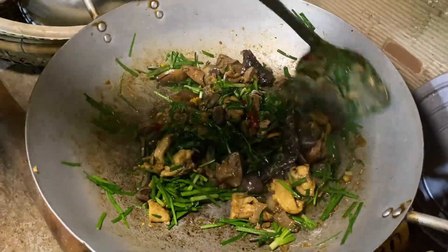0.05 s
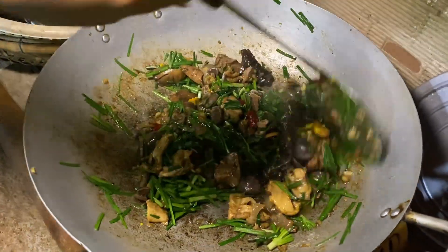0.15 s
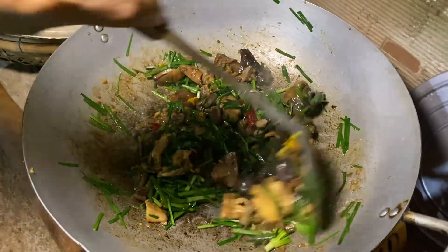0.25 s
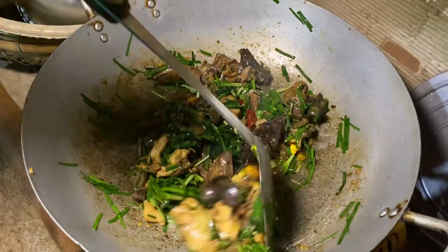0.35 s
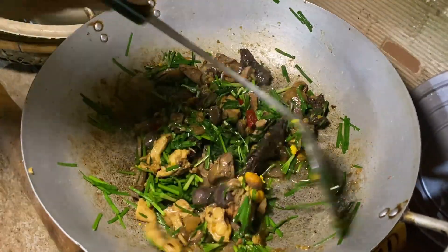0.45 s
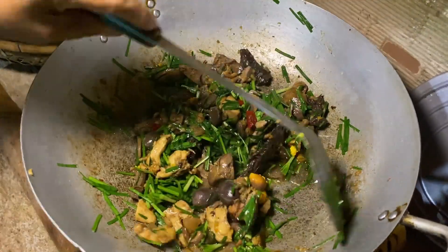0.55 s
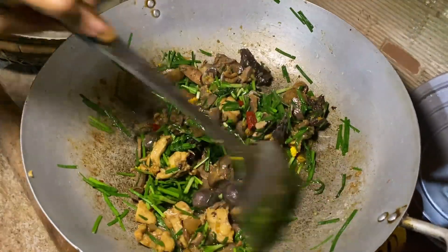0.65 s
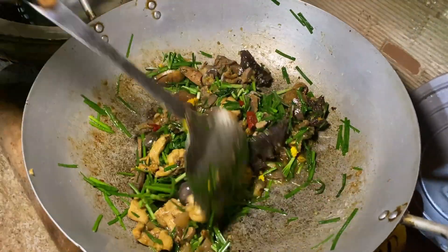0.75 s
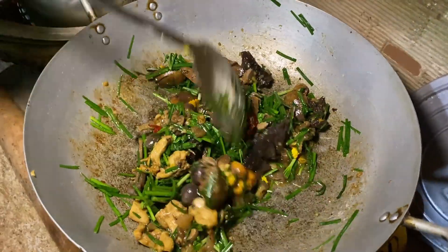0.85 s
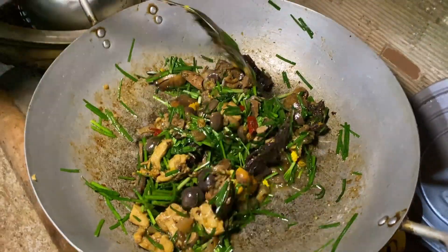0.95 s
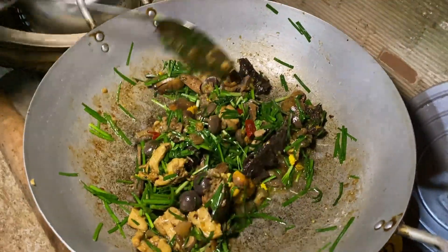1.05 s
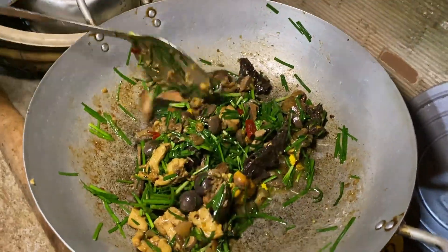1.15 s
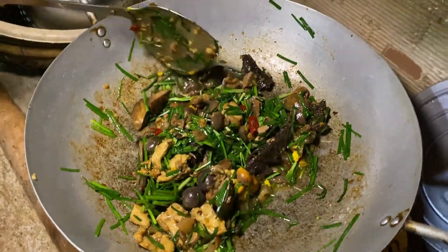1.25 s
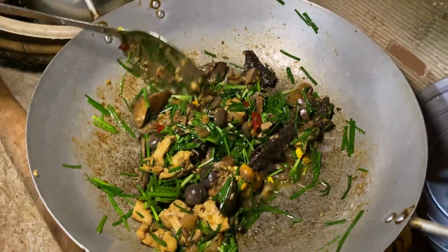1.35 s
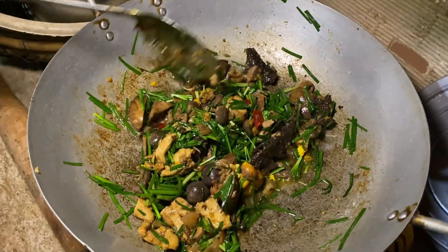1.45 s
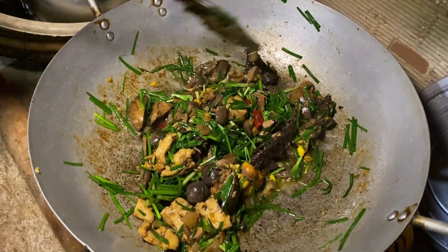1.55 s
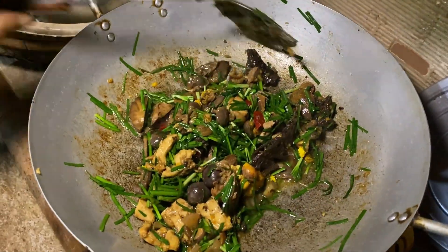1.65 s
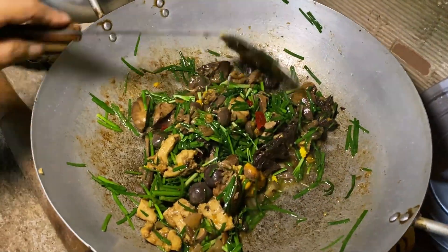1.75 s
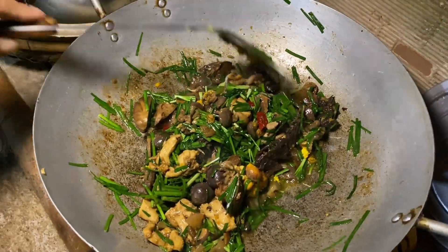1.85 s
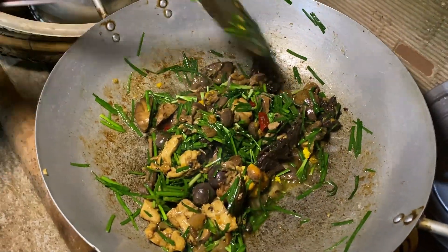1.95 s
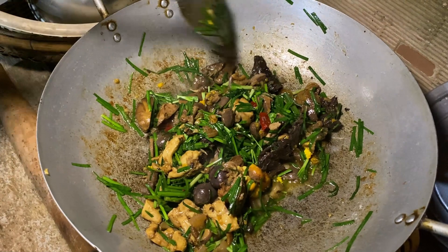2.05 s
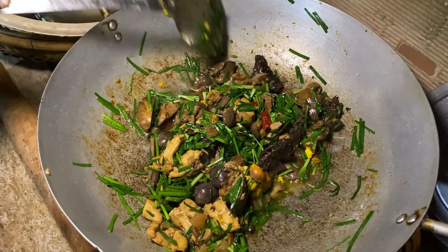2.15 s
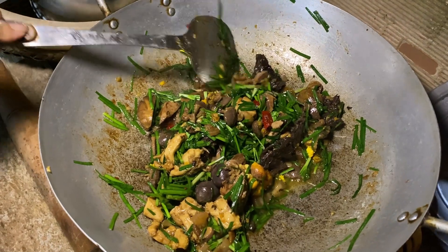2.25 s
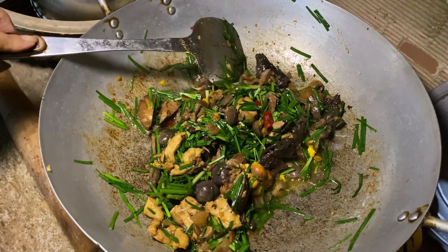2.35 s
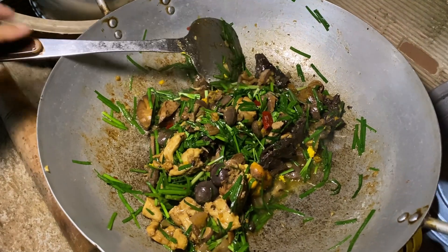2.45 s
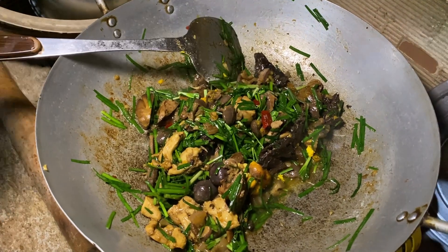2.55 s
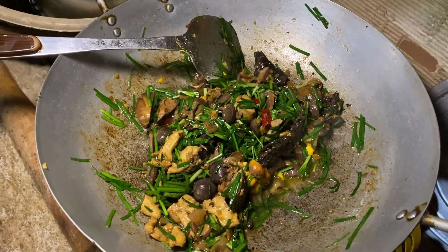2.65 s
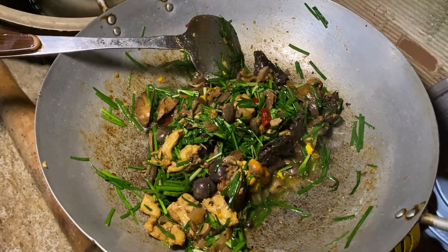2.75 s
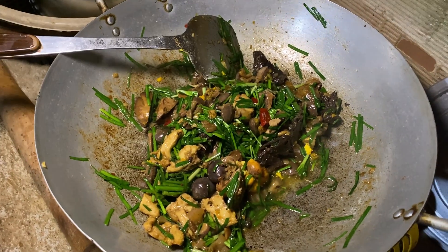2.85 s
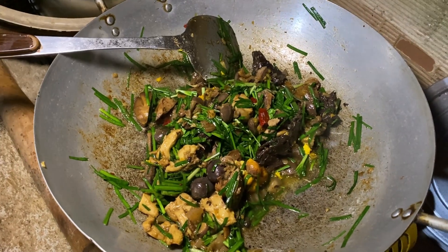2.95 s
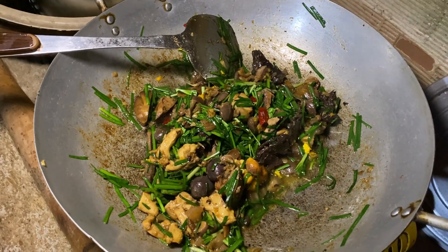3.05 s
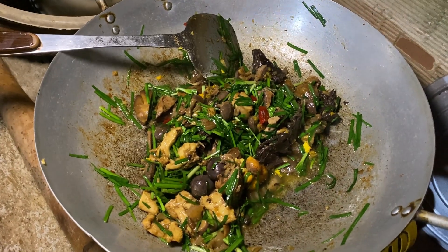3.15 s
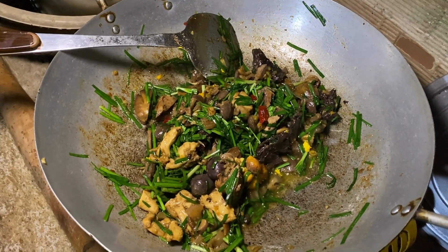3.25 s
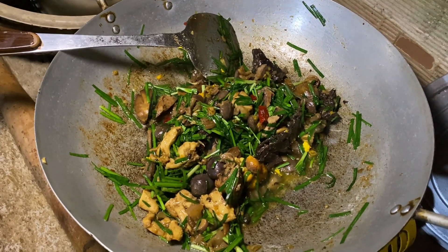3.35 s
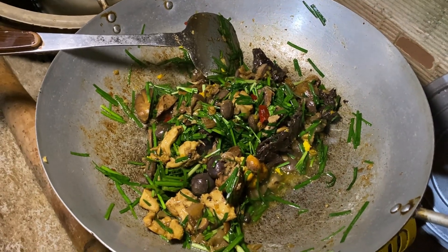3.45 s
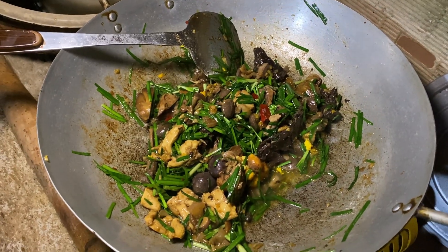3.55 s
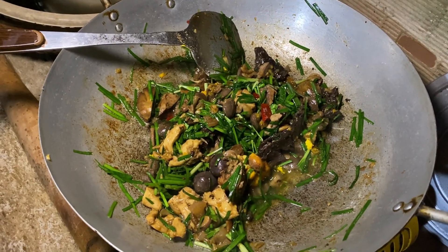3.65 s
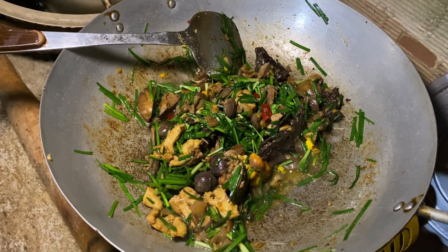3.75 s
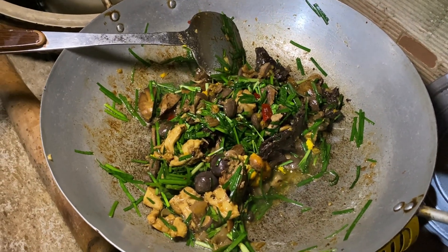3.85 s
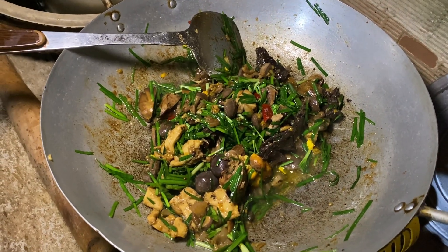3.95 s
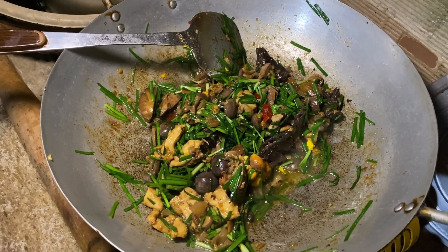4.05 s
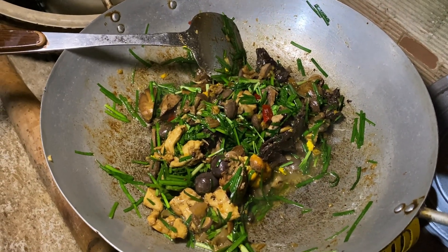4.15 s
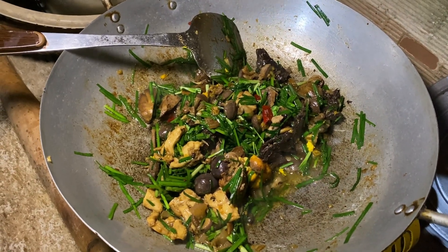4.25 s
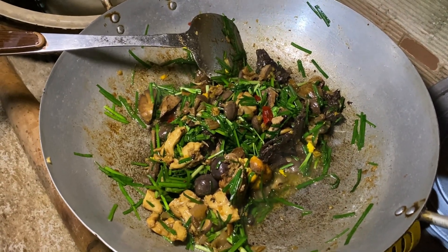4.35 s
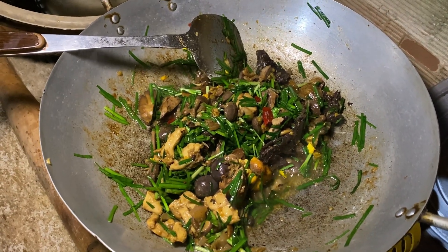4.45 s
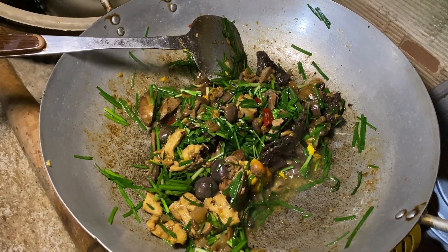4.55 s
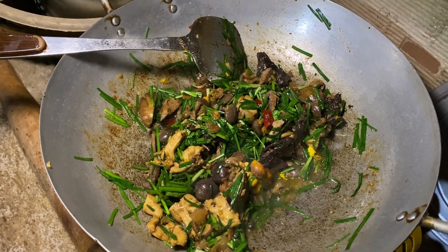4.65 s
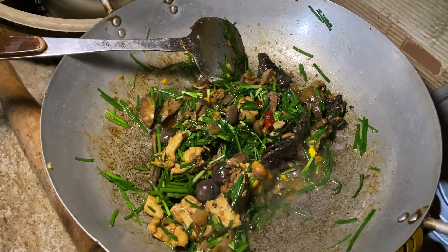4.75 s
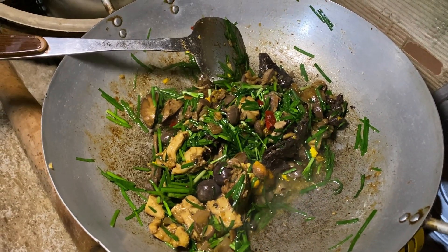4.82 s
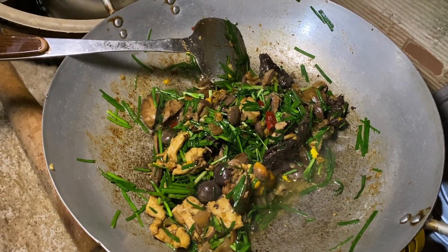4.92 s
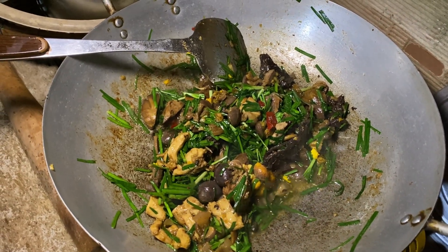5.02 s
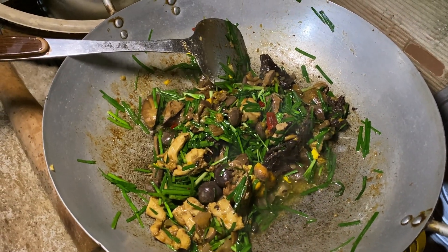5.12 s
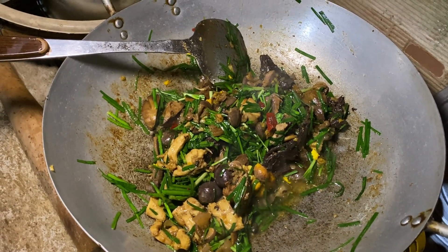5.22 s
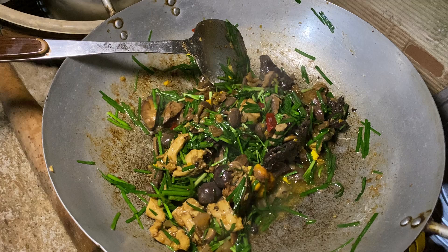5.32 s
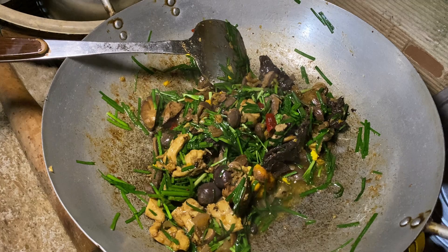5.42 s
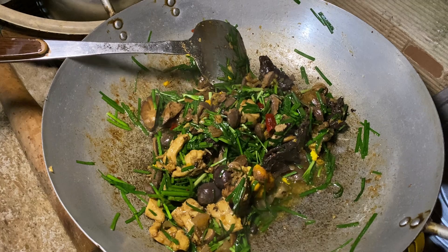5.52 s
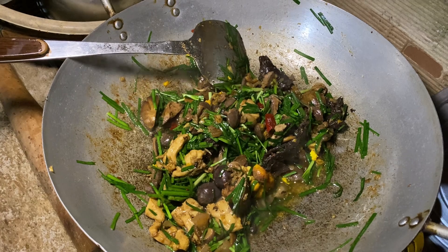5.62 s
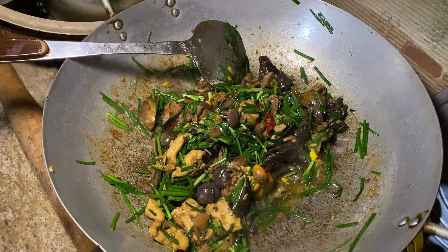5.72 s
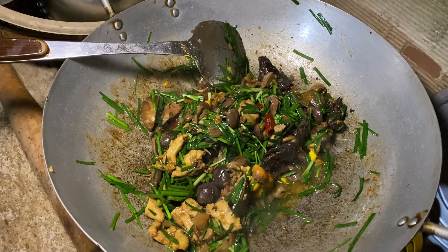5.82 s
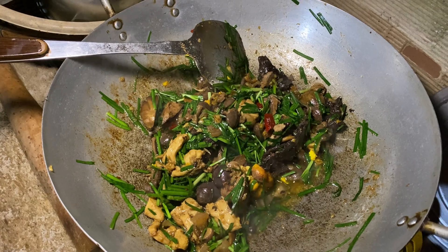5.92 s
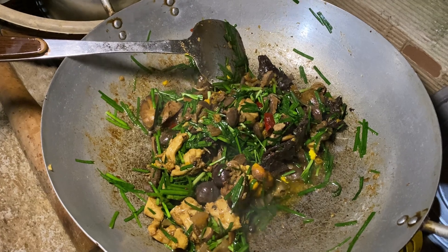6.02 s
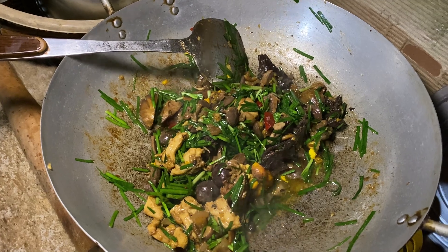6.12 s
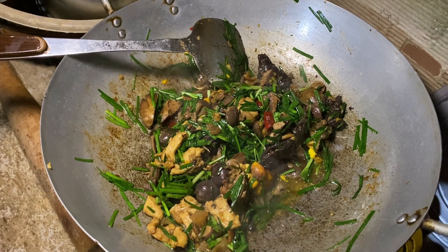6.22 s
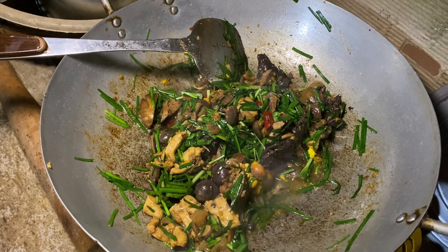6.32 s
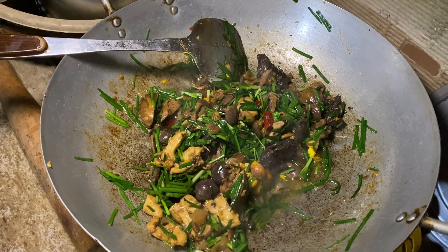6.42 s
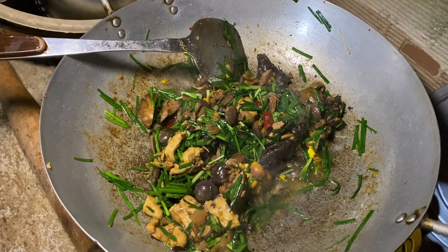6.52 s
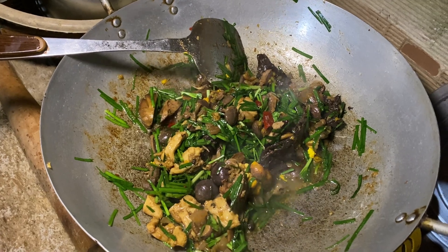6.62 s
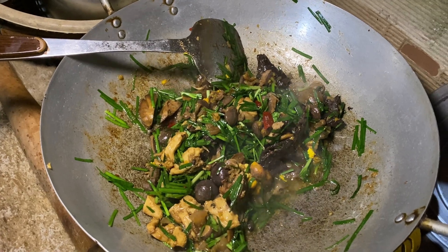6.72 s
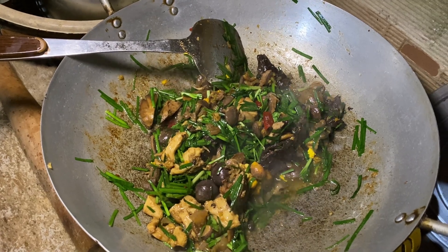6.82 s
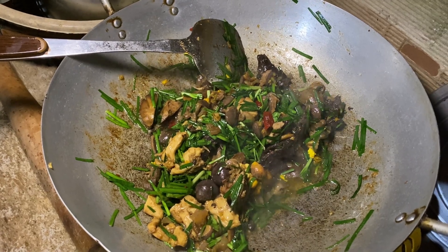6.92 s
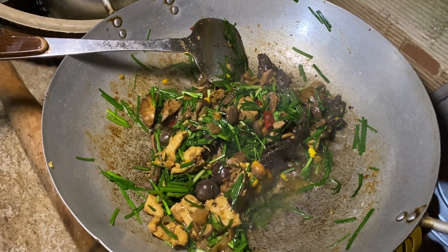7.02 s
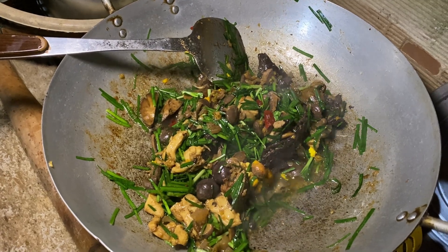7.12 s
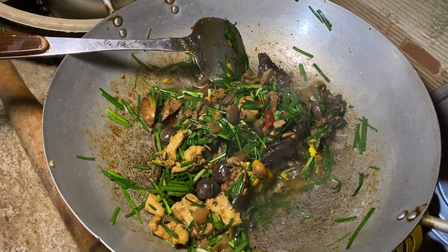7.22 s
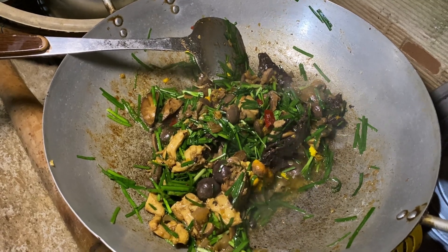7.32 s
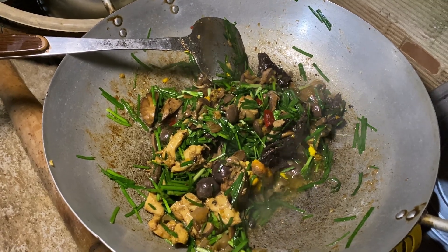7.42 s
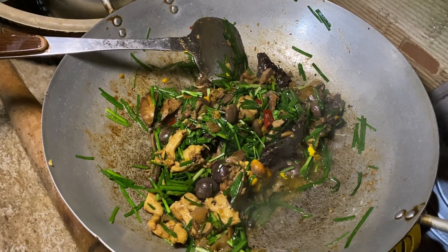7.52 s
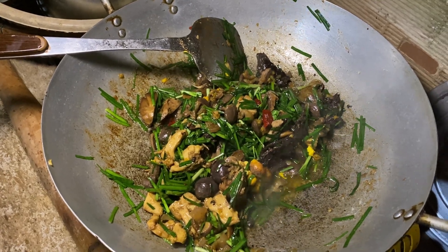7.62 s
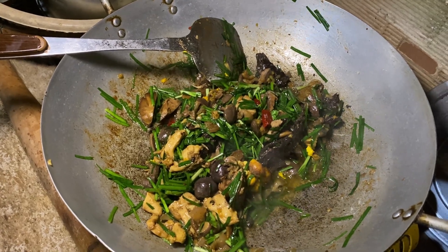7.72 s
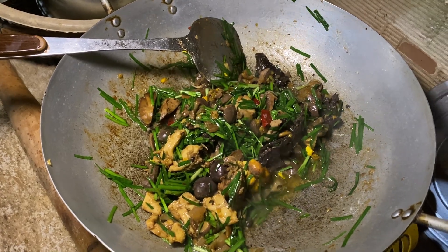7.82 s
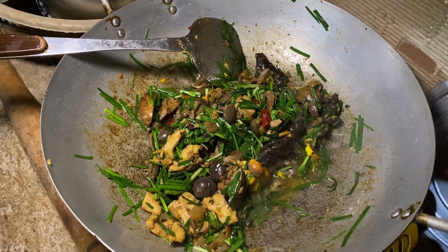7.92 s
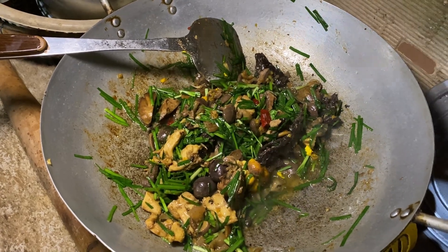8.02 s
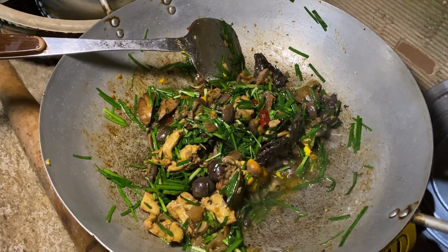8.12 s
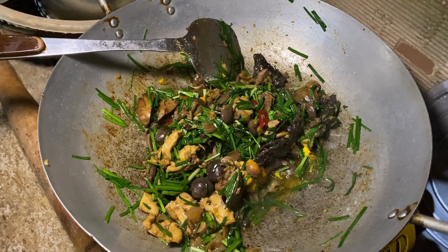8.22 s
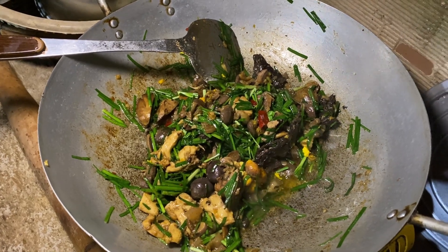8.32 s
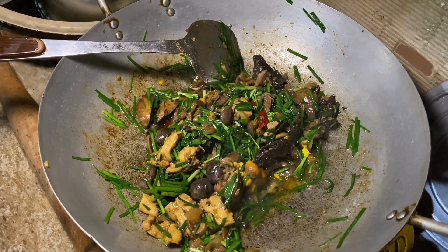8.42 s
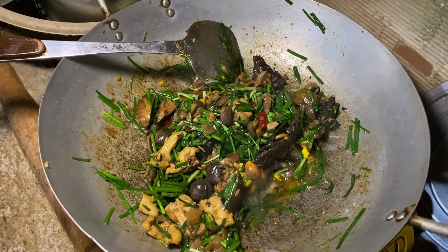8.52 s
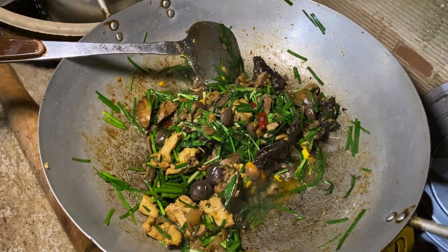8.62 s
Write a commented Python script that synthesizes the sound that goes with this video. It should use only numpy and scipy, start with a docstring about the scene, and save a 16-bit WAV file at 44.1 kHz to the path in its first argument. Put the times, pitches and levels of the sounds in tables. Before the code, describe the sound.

Food sizzles over a roaring gas burner as a metal spatula scrapes and clanks on a wok, then the flame drops and the stove is bumped.

```python
"""Food sizzles hard in a wok, over the lumpy roar of a gas burner: outdoors, close to a two-port microphone.
Sizzle and flame are coloured noise. A steel spatula scrapes, raps the rim three times and is laid down,
each contact a push and chatter that ring modes of wok and blade. Oil pops are short decaying tones.
The burner dies; its knob is worked until it relights lower, and the stove frame takes a few dull bumps."""
import sys
import numpy as np
from scipy import signal
from scipy.fft import irfft
from scipy.io import wavfile
from scipy.ndimage import uniform_filter1d

SR = 44100
rng = np.random.default_rng(int(sys.argv[2]) if len(sys.argv) > 2 else 0)


def persist_wave(psi):
    """Save psi, clipped to +-1, as 16-bit WAV."""
    counts = np.round(np.clip(psi, -1, 1) * 32767).astype(np.int16)
    wavfile.write(sys.argv[1], SR, np.atleast_2d(counts).T)


N = 382347  # samples

# All levels stand ahead of the port colours and of the gain control in record().
# Sizzle of the food: start_s, level_db
SIZZLE_LEVEL = [(0.0, -39.5), (4.64, -40.5), (5.53, -43.5), (6.1, -46), (8.67, -50)]
# Spectrum of the sizzle: pitch_hz, relative level_db per Hz
SIZZLE_COLOUR = [(410, -77.5), (700, -14.5), (1310, -3), (1580, -1.5), (1840, -1), (2490, -2), (4730, 1),
                 (8530, -4), (9600, -13.5), (10100, -12.5), (11100, -18.5), (12500, -23.5), (13900, -24),
                 (15000, -13.5), (16000, -39)]
# Roar of the flame, which dies and is relit lower and duller:
# start_s, level_db before slope_db_per_octave changes the balance, slope_db_per_octave above 450 Hz
FLAME_COURSE = [(0, -44.5, -2), (2.6, -46, -0.5), (5.37, -47, 0), (5.441, -58, 1.5), (6.15, -59, -0.5),
                (6.4, -46.5, -4), (8.67, -47, -3.5)]
# Spectrum of the flame: pitch_hz, relative level_db per Hz
FLAME_COLOUR = [(24, -54.5), (45, -9), (103, 4), (143, -11), (183, 3), (223, -10), (436, -9.5), (690, -8.5),
                (1020, -14.5), (1370, -9), (2000, -23.5), (2600, -57), (4400, -120)]
# How alike sizzle and flame are at the two ports: pitch_hz, likeness (0-1)
PORT_LIKENESS = [(60, 1), (200, 0.97), (600, 0.28), (1300, 0.45), (1900, 0.63), (2450, 1), (3200, 0.61),
                 (6000, 0.029), (9000, 0.67), (15000, 1)]
# Phase by which left leads for sizzle, flame and pops: pitch_hz, lead_rad
HISS_LEAD = [(0, 0), (1550, 0.5), (1810, 3.4), (2500, 0.5), (3270, -3.8), (4390, -4.5), (5860, -2.6),
             (9730, -12.4), (10700, -13.3), (12600, -16.5), (13200, -18.7), (14500, -18.9), (15200, -21.9),
             (16100, -22.0)]
# Left minus right for sizzle, flame and pops: pitch_hz, level_db
HISS_TILT = [(60, -0.5), (700, 0.5), (1100, -0.5), (2500, 0.7), (4300, 0.5), (5800, 11), (8000, -1.5),
             (10000, 0), (16000, 0)]

# Spatula on the wok: start_s, strength_db, chatter_s (decay), hardness_hz,
# wok_ring_db, blade_ring_db, rasp_db (over the strength; low where food pads the blow),
# bright_db_per_octave (how much the spot favours high modes of wok and blade)
RAPS = [(.02, -26, 0.02, 606, -33, -3, -2.5, -4), (0.079, -23, 0.039, 705, -36, -23, -13.5, 2),
        (0.113, -34, 0.0097, 350, -19, -35, -24, 0.1), (0.546, -23.5, 0.0014, 447, -20, -33, -33, -4),
        (0.565, -20, 0.018, 220, -30, -38, -21, -4), (0.586, -31, 0.016, 600, -28, -38, -6, -11),
        (0.599, -19.5, 0.017, 200, -26, -38, -26, -7), (0.628, -25, 0.029, 300, -32, -38, -28, -7),
        (0.683, -29, 0.015, 300, -26, -38, -25, 1), (.746, -18.5, 0.01, 330, -19.5, -39, -36, -2),
        (0.838, -29, 0.009, 350, -26, -32, -20, -1), (1.012, -15, 0.018, 605, -41, -33, -7, 8),
        (1.022, -3.5, 0.0044, 2580, -28.5, -29, -8, 0.1), (1.028, -9, 0.0072, 1200, -34, -43, -30, 0.1),
        (1.054, -15.5, 0.0056, 1120, -43, -40, -32, 5), (1.075, -16, 0.017, 250, -19, -40, -35, -3),
        (1.311, -5, 0.0061, 2450, -26, -27, -6.5, 1.5), (1.317, -9.5, 0.007, 1200, -30.5, -37, -15, 3),
        (1.349, -27, 0.014, 1000, -14, -5, -9, -1.5), (1.418, -21, 0.021, 300, -19, -33, -35, -11),
        (1.717, -8.5, 0.0049, 1680, -28.5, -29, -15, 1), (1.744, -23, 0.02, 696, -31, -33, -20, 8),
        (1.79, -20, 0.035, 220, -30, -33, -19, -8), (2.102, -23, 0.015, 4120, -17, -10.5, 0.7, 2.5),
        (2.148, -24.5, 0.014, 660, -17, 1, -11, -6), (2.252, -12.5, 0.011, 260, -19, -45, -20, 1.5),
        (2.328, -17, 0.005, 1490, -19, -31, -5.5, 3.5), (2.425, -25, 0.02, 3000, -15.5, -4, 2, 2.5),
        (2.446, -21, 0.0034, 2060, -41, -16, 1.5, 9), (2.459, -24, 0.015, 2500, -27, -6, -7, -2),
        (2.477, -29, 0.014, 400, -30, -9, -12, 3), (2.5, -35, 0.016, 900, -31, -6, -14, 0.1),
        (2.523, -45, 0.015, 800, -36, -11, -18, 0.1)]
# Dull first thud of the wok: pitch_hz (sounded at 0.98 of it), level_db, t60_s
WOK_THUD = [(134.5, -4.5, 0.02), (242, -1, 0.022), (407, -2, 0.021), (435, 0.5, 0.011), (497, 2, 0.039),
            (653, -3, 0.025), (770, 3.5, 0.015), (910, -2, 0.026), (1093, -3.5, 0.029), (1178, -0.5, 0.021),
            (1377, -5.5, 0.018), (1650, -8, 0.034), (1740, -9, 0.011), (1830, -8.5, 0.014)]
# Ring of the wok: pitch_hz (sounded at 0.98 of it), level_db, t60_s
WOK_RING = [(148, -6, 0.84), (245.8, 0.5, 0.96), (291, -14, 0.3), (378, -0.2, 0.99), (434, -2.5, 0.18),
            (525, -3.5, 0.87), (671, -3, 0.45), (771, 1, 0.23), (840, -2.5, 0.24), (900, -18, 0.64),
            (994, -3, 0.26), (1125, -15, 0.53), (1090, 2, 0.148), (1460, -4, 0.44)]
# Ring of the spatula blade: pitch_hz (sounded at 0.98 of it until laid down), level_db, t60_s
BLADE_RING = [(757.6, -4, 0.36), (810, -15.5, 0.1), (1207, -0.5, 0.073), (1490, -3, 0.04),
              (1500, -6.5, 0.071), (1697, 5.5, 0.12)]
# Small, quick modes that colour the steel rasp: pitch_hz (sounded at 0.98 of it), relative level_db, t60_s
STEEL_RASP = [(2300, -10.5, 0.0029), (2800, -6, 0.037), (2930, 4, 0.0037), (3780, 4, 0.0057),
              (4460, 4.5, 0.011), (4880, 1.5, 0.012), (5500, -3, 0.01), (5680, 8.5, 0.0043),
              (7180, -2, 0.012), (8900, -2, 0.0033), (9630, -18, 0.0043), (13600, -23, 0.0027)]
# The blade settles and chokes whatever still rings: start_s, decay_s
CHOKES = [(2.245, 0.015), (2.51, 0.063)]
# Lying on the wok the blade sounds lower (0.97 in place of 0.98 of its pitch) and rings shorter
LAID_S, LAID_PITCH, LAID_RING = 2.42, 0.97, 0.4  # s, factor, factor
# The bowl is not quite round: each mode is a close pair that beats
PAIR_GAP, PAIR_DEPTH = 0.0163, 0.45  # share of the pitch, depth 0-1
# Every contact lands elsewhere: spread of mode pitch (share) for thud, wok, blade and rasp
RAP_DRIFT = (.025, 0, .004, .03)
SPOT_DB = 2.0  # spread of mode level
# Phase by which left leads for all blows: pitch_hz, lead_rad
BLOW_LEAD = [(0, 0), (140, .1), (270, .7), (600, .05), (1200, .3), (1600, 1.2), (2500, 1.2), (16000, 1.2)]
# Left minus right for the spatula: pitch_hz, level_db
RAP_TILT = [(100, -1), (280, -0.5), (550, 7), (1200, 0.5), (4000, 0.5)]

# Oil pops: start_s, level_db (where the decay begins), pitch_hz
POPS = [(3.175, -25, 1390), (3.953, -20.5, 1610), (5.037, -24.5, 1610), (5.304, -25.5, 2460)]

# Knob worked: start_s, strength_db, chatter_s (decay), hardness_hz
TURNS = [(6.174, -28.5, 0.042, 1550), (6.219, -35.5, 0.027, 2000), (6.245, -40, 0.011, 804),
         (6.283, -32, 0.019, 3000), (6.309, -34, 0.0036, 1490), (6.38, -25.5, 0.022, 1300),
         (6.394, -25.5, 0.02, 2930), (6.417, -23, 0.02, 1090), (6.444, -32, 0.029, 1000),
         (8.325, -39, 0.016, 900), (8.345, -38, 0.025, 1420), (8.424, -34, 0.029, 970),
         (8.607, -42, 0.016, 1480)]
# Stove frame bumped: start_s, strength_db, chatter_s (decay), hardness_hz
BUMPS = [(6.519, -58, .012, 300), (6.726, -17, 0.0063, 700), (6.733, -11, 0.0035, 985),
         (6.743, -15, 0.0093, 900), (6.755, -12, 0.022, 400), (6.806, -25, 0.031, 250),
         (6.862, -38, 0.019, 220), (7.189, -35, 0.0072, 300), (8.137, -10.5, 0.003, 190),
         (8.187, -23.5, 0.012, 250), (8.36, -18.5, 0.004, 190), (8.395, -25, .015, 250),
         (8.434, -24.5, 0.005, 300), (8.465, -26, 0.03, 200)]
# Drive of frame, knob and grit (one row each) when the knob turns:
# level_db over the strength at HARD_HZ, slope_db_per_octave of hardness; harder turns rasp more
TURN_SHARES = [(-7.5, -31), (-1.5, 3.5), (-18.5, 9.5)]
# The same rows and columns for bumps
BUMP_SHARES = [(-23, 2), (-18, 0), (-52, 6)]
HARD_HZ = 1000
# Dull first thud of the stove: pitch_hz (sounded at 0.98 of it), level_db, t60_s
STOVE_THUD = [(101, -13, 0.1), (175, 5, 0.025), (282, -3, 0.021), (357, -6.5, 0.037), (530, -7, 0.028),
              (664, -4, 0.04), (930, -16, 0.04), (1260, -19.5, 0.06), (1380, -34, 0.017),
              (1750, -13, 0.017)]
# Ring of the stove frame: pitch_hz (sounded at 0.98 of it), level_db, t60_s
FRAME_RING = [(104.4, 1.5, 0.61), (142.9, -1, 0.6), (159, -9, 0.24), (219, -2, .25), (304, 6, 0.16),
              (371, -6, 0.29)]
# Ring of the knob: pitch_hz (sounded at 0.98 of it), level_db, t60_s
KNOB_RING = [(351, -1, 0.076), (557, -2, 0.045), (923, -6.5, 0.044), (1154, 1.5, 0.041), (1426, 1, 0.038),
             (1740, -1.5, 0.028), (2020, -9.5, 0.018), (2380, -0.5, 0.019), (2840, -1, 0.011),
             (3200, 9, 0.011), (3930, 0, 0.0086)]
# Quick modes that colour the grit: pitch_hz (sounded at 0.98 of it), relative level_db, t60_s
GRIT_RASP = [(2100, 8, 0.0011), (2110, 1, 0.0078), (2900, -4, 0.0011), (3270, 3, 0.0065), (3940, 6, 0.0023),
             (5260, -2, 0.011), (6700, 1, 0.003), (9500, -1, 0.0023)]
# Spread of mode pitch (share) for thud, frame, knob and grit
STOVE_DRIFT = (.04, .01, .035, .06)
# Left minus right for knob and frame: pitch_hz, level_db
STOVE_TILT = [(100, 0.5), (280, 0.5), (550, 4), (1200, 4), (4000, 0.5)]

UNLIKE_RAD = 0.9  # how far the chatter differs between the ports
BASS_HZ, EDGE_HZ = 64, 15900  # the microphone loses what lies below; upper band limit
CEILING = 0.92  # full scale is 1


def gain_of(db):
    """Decibels to a factor."""
    return 10 ** (np.asarray(db) / 20)


def evened(x):
    """Scales to rms 1."""
    return x / np.sqrt(np.mean(x ** 2) + 1e-20)


def read(points, hz):
    """A spectrum table at the frequencies hz, interpolated on a log pitch scale."""
    f, value = np.transpose(points)
    return np.interp(np.log(hz + 1), np.log(f + 1), value)


def along(curve):
    """The level column of a curve as a gain for every sample."""
    s, db = np.transpose(curve)[:2]
    return gain_of(np.interp(np.arange(N) / SR, s, db))


def hiss(colour, patchy_db, flicker_db, slope=((0, 0),)):
    """Partly alike noise pair, with drifting patches, a flicker shared by all bands and a moving slope."""
    frames, hz = N // 256 + 5, np.fft.rfftfreq(1024, 1 / SR)
    a, b, c, d, patches = rng.standard_normal((frames, 513, 5)).T
    patches = uniform_filter1d(patches, size=10, axis=0)  # wide in pitch
    patches = evened(uniform_filter1d(patches, size=8, axis=1))  # long in time
    same = np.clip(read(PORT_LIKENESS, hz), -1, 1)[:, None]
    left = a + 1j * b
    right = same * left + np.sqrt(1 - same ** 2) * (c + 1j * d)
    octaves = np.log2(np.maximum(hz / 450, 1))
    slope_db = np.outer(octaves, np.interp(np.arange(frames) * 256 / SR, *np.transpose(slope)))
    flicker = flicker_db * rng.standard_normal(frames)
    level_db = read(colour, hz)[:, None] + slope_db + patchy_db * patches + flicker
    spectra = np.array([left, right]) * gain_of(level_db)
    return evened(signal.istft(spectra, nperseg=1024, noverlap=768)[1][:, :N])


def sizzle():
    """Thousands of tiny steam bubbles blur to hiss; the larger ones roughen it."""
    bursts = rng.random(N) < 900 / SR  # about 900 larger bubbles a second
    size = gain_of(0.38 * np.minimum(rng.exponential(1, N), 5)) * bursts
    spit = signal.oaconvolve(size, np.exp(-np.arange(200) / 30))[:N]
    steam = hiss(SIZZLE_COLOUR, patchy_db=1.17, flicker_db=0.9)
    return steam * evened(1 + 0.25 * spit) * along(SIZZLE_LEVEL)


def flame():
    """Lumpy low roar of the burner: noise whose level and treble slope follow the flame."""
    slope = np.array(FLAME_COURSE)[:, ::2]
    return hiss(FLAME_COLOUR, patchy_db=1.82, flicker_db=1.0, slope=slope) * along(FLAME_COURSE)


def ringing(modes, luck, drift, pitch=0.98, ring=1.0, bright_db=0.0, pivot_hz=400, beat=0.0):
    """Impulse response of a struck body; the spot hit shifts and reweighs its modes."""
    t = np.arange(0, ring * max(mode[2] for mode in modes), 1 / SR)
    total = np.zeros(len(t))
    for k, ((hz, db, t60), (level_luck, pitch_luck)) in enumerate(zip(modes, luck)):
        spot_db = SPOT_DB * level_luck + bright_db * np.log2(hz / pivot_hz)
        envelope = gain_of(db + spot_db - 60 * t / (ring * t60))
        beating = 1 + beat * np.cos(2 * np.pi * (PAIR_GAP * hz * t + pitch_luck))
        tone = np.sin(2 * np.pi * hz * pitch * (1 + drift * pitch_luck) * t)
        # neighbouring modes start in opposite senses, so that the first instant is no spike
        total += (-1) ** k * envelope * beating * tone
    return total


def contact_drives(length, hard_hz, swell, noise, other):
    """Forces of one contact, a push then dying chatter, on thud, body, small part and rasp."""
    t = np.arange(len(noise)) / SR
    rise_s = 2.2 / hard_hz + swell * length  # soft blows rise slowly
    fade = np.exp(-t / length) * (1 - np.exp(-t / rise_s))
    push = np.exp(-2 * np.pi * hard_hz * t) * t  # soft blows carry no treble
    push /= push.sum()
    pair = np.array([noise, np.cos(UNLIKE_RAD) * noise + np.sin(UNLIKE_RAD) * other]) * fade
    pair /= np.linalg.norm(pair[0])
    force = signal.fftconvolve(pair, push[None], axes=1)[:, :len(t)]
    push *= np.sqrt(0.0051 / (0.0098 + length)) / (1 + 4 * swell)  # a long scrape has little of a first blow
    force *= 1.44 * length / (0.0069 + length)  # a clean blow has little chatter
    return [0.87 * force + 1.57 * push, 0.38 * force + 1.38 * push, force + 1.4 * push,
            pair * np.linalg.norm(fade)]


def blows(table, levels, bodies, drifts, lowest_hz, swell=0.0, chokes=(), laid_s=np.inf,
          brights=None, beat=0.0):
    """Each contact drives four sets of modes, which ring until they fade or are choked."""
    count, samples = len(table), 6144
    chatter = rng.standard_normal((count, 2, samples))
    slips = evened(uniform_filter1d(rng.standard_normal((count, 1, samples)), size=120, axis=2))
    chatter *= gain_of(2.4 * slips)  # the contact grips and slips in uneven grains
    lucks = rng.standard_normal((count, 4, 14, 2))
    brights = np.zeros(count) if brights is None else brights
    out = np.zeros((2, N + 3 * SR))
    contacts = zip(table[:, :4], np.transpose(levels), chatter, lucks, brights)
    for (s, _, length, hard_hz), dbs, (noise, other), luck, bright in contacts:
        drives = contact_drives(length, hard_hz, swell, noise, other)
        thud, body, small, rasp = zip(bodies, luck, drifts)
        laid = (LAID_PITCH, LAID_RING) if s > laid_s else ()
        rasp_ring = ringing(*rasp)
        rings = [ringing(*thud), ringing(*body, bright_db=bright, beat=beat),
                 ringing(*small, *laid, bright_db=bright, pivot_hz=1094),
                 rasp_ring / np.linalg.norm(rasp_ring)]
        for db, drive, ring in zip(dbs, drives, rings):
            sound = gain_of(db) * signal.fftconvolve(drive, ring[None], axes=1)
            now = s + np.arange(sound.shape[1]) / SR
            for at, dies in chokes:
                if s < at:
                    sound = sound * np.exp(-np.maximum(now - at, 0) / dies)
            out[:, round(s * SR):][:, :len(now)] += sound
    # too small to radiate bass
    out = signal.sosfilt(signal.butter(2, lowest_hz, "high", fs=SR, output="sos"), out[:, :N])
    difference = (out[0] - out[1]) / 2
    bass = signal.sosfilt(signal.butter(1, 260, fs=SR, output="sos"), difference)
    return out - np.outer([1, -1], bass)  # long waves reach both ports alike


def spatula():
    """Steel on the wok: wok ring, blade ring and rasp depend on how bare the steel lands."""
    rows = np.array(RAPS)
    levels = [rows[:, 1], *(rows[:, 1] + rows[:, 4:7].T)]
    return blows(rows, levels, (WOK_THUD, WOK_RING, BLADE_RING, STEEL_RASP), RAP_DRIFT, lowest_hz=110,
                 chokes=CHOKES, laid_s=LAID_S, brights=rows[:, 7], beat=PAIR_DEPTH)


def pops():
    """Water bursting in the oil: a decaying tone of a couple of cycles each."""
    out, t = np.zeros(N + 600), np.arange(600) / SR
    for s, db, hz in POPS:
        out[round(s * SR):][:600] += gain_of(db) * np.sin(2 * np.pi * hz * t) * np.exp(-t / 0.00057)
    return out[:N]


def share(table, law):
    """Level of one body for every blow, from strength and hardness."""
    return table[:, 1] + law[0] + law[1] * np.log2(table[:, 3] / HARD_HZ)


def stove(table, shares, swell):
    """Contacts on the stove: thud, frame, knob and grit, weighted by the hardness of the blow."""
    rows = np.array(table)
    levels = [rows[:, 1]] + [share(rows, law) for law in shares]
    return blows(rows, levels, (STOVE_THUD, FRAME_RING, KNOB_RING, GRIT_RASP), STOVE_DRIFT,
                 lowest_hz=65.4, swell=swell)


def at_the_ports(pair, tilt, lead):
    """A source reaches the two ports with its own colour and delay, split evenly between them."""
    hz = np.fft.rfftfreq(1024, 1 / SR)
    port = gain_of(read(tilt, hz) / 2) * np.exp(0.5j * np.interp(hz, *np.transpose(lead)))
    taps = np.roll(irfft([port, 1 / port]), 512, axis=1) * np.hanning(1024)
    return signal.oaconvolve(pair, taps, axes=1)[:, 512:][:, :N]


def scene():
    """All sources at the microphone, close by."""
    cooking = at_the_ports(sizzle() + flame() + pops(), HISS_TILT, HISS_LEAD)
    steel = at_the_ports(spatula(), RAP_TILT, BLOW_LEAD)
    handled = stove(TURNS, TURN_SHARES, swell=0.073) + stove(BUMPS, BUMP_SHARES, swell=0.041)
    return cooking + steel + at_the_ports(handled, STOVE_TILT, BLOW_LEAD)


def record(dry):
    """Bass loss, gain control that ducks the sizzle after loud blows, a soft ceiling and the band limit."""
    thinned = signal.sosfilt(signal.butter(3, BASS_HZ, "high", fs=SR, output="sos"), dry)
    power = abs(uniform_filter1d((thinned ** 2).mean(0), size=200))
    power_db = 10 * np.log10(power + 1e-12)
    fall = np.arange(N) * 30.0 / SR  # the held level falls 30 dB a second
    held_db = np.maximum.accumulate(power_db + fall) - fall
    over_db = np.maximum(held_db + 12, 0)  # threshold -12 dB
    ducked = thinned / gain_of(0.5 * uniform_filter1d(over_db, size=200))  # half the excess is taken off
    ducked = ducked / (1 + (ducked / CEILING) ** 6) ** (1 / 6)  # peaks round off at the ceiling
    band = signal.firwin(511, EDGE_HZ, window=("kaiser", 9), fs=SR)
    return signal.oaconvolve(ducked, band[None], "same")


dry = scene()
out = record(dry)
persist_wave(out)
```